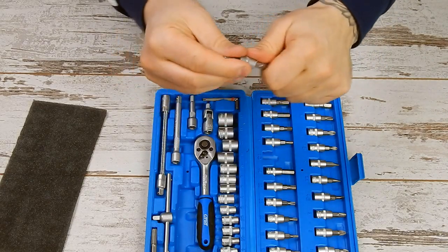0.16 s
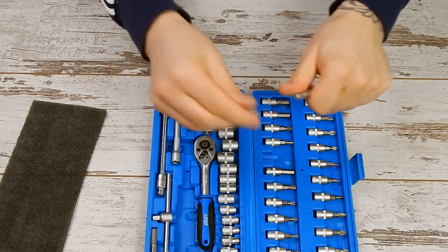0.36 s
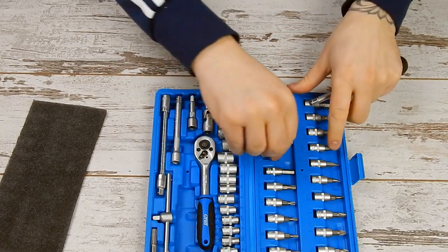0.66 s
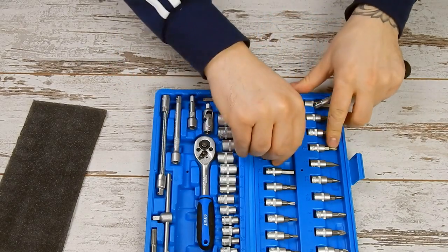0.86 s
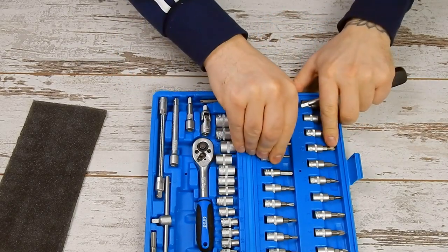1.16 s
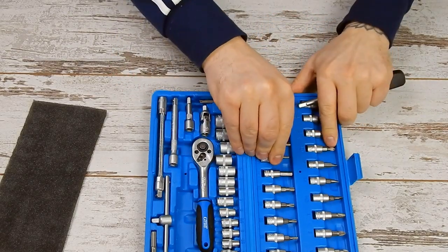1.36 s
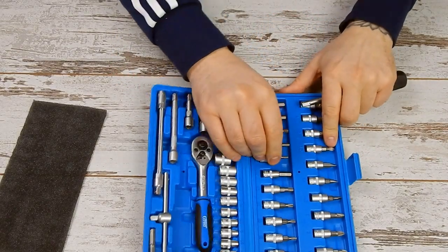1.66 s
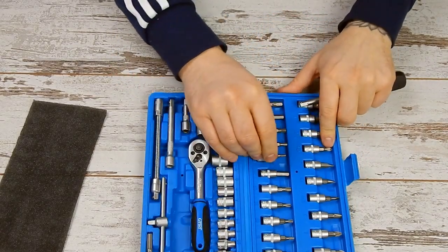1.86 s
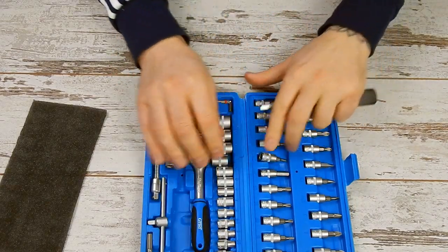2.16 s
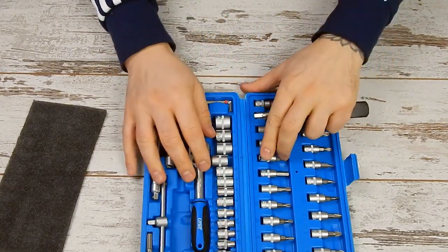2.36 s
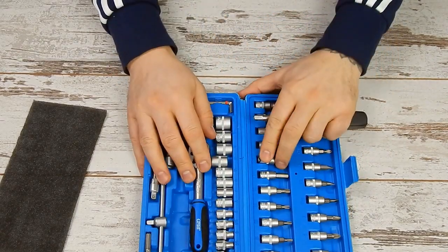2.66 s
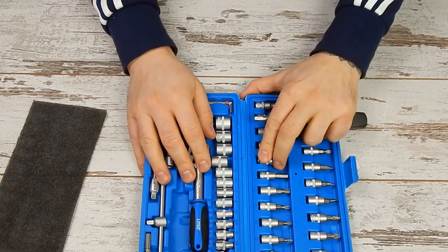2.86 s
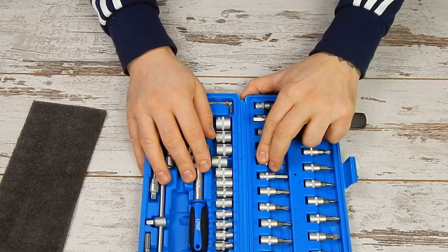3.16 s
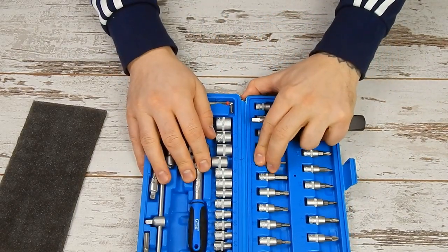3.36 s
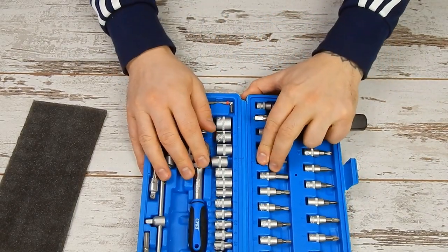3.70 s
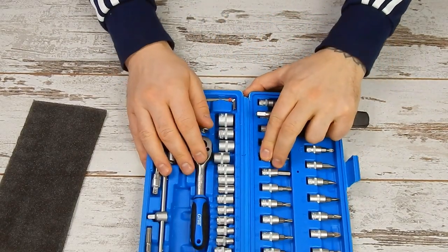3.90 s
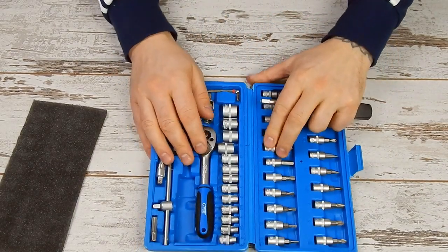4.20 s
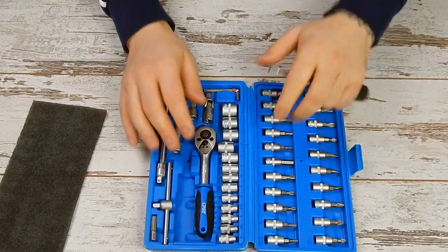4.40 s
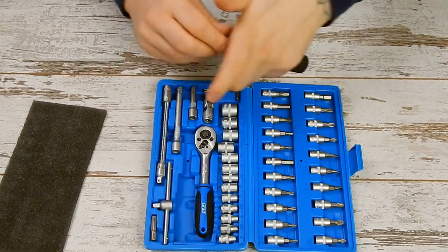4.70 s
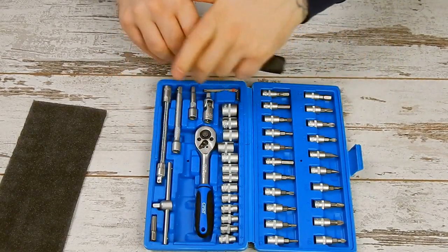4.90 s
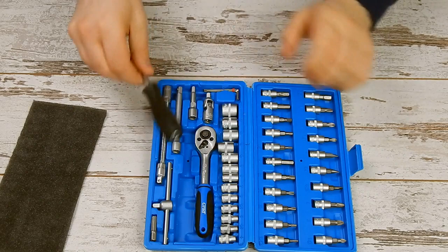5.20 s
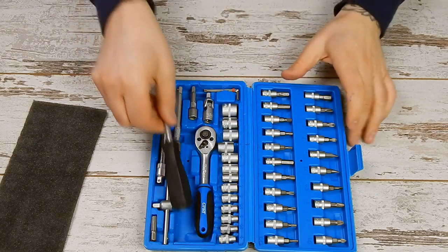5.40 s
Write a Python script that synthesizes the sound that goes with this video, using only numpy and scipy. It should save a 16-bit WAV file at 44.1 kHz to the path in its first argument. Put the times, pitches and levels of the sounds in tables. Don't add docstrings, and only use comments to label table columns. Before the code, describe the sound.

Hands at a plastic tool case: bright steel ticks, a burst of sharp clip snaps, one loud clack, sparse taps, low faint hum.

```python
import sys
import numpy as np
from scipy import signal
from scipy.fft import rfft, irfft
from scipy.io import wavfile
from scipy.ndimage import uniform_filter1d

SR = 44100
rng = np.random.default_rng(int(sys.argv[2]) if len(sys.argv) > 2 else 0)


def boost_factor(decibels):
    exponent = np.asarray(decibels, float) / 20
    return 10 ** exponent


def dump(signal):
    limited = np.clip(np.atleast_2d(signal).T, -1, 1)
    pcm = np.round(limited * 32767).astype(np.int16)
    wavfile.write(sys.argv[1], SR, pcm)


N = 244622


def on_log(table, hz):
    f, value = np.transpose(table)
    return np.interp(np.log(hz + 1), np.log(f), value)


def shaped(x, table):
    size = x.shape[-1]
    gain = boost_factor(on_log(table, np.fft.rfftfreq(size, 1 / SR)))
    y = irfft(rfft(x) * gain, size)
    return y / np.sqrt(np.mean(y ** 2))


def walk(rate_hz):
    slow = signal.butter(2, rate_hz, fs=SR, output="sos")
    y = signal.sosfilt(slow, rng.standard_normal(N))
    return y / np.std(y)


def octaves(modes, hz):
    return np.log2(np.array(modes)[:, :1] / hz)


def ring(modes, extra_db, luck, spread_db=1.5, detune=.015):
    hz, db, t60 = np.transpose(modes)[:, :, None]
    t = np.arange(SR // 15) / SR
    size = luck[:len(modes), None]
    bend = luck[::-1][:len(modes), None]
    level = boost_factor(db + extra_db + spread_db * size)
    decay = np.exp(-np.log(1000) * t / t60)
    y = level * decay * np.sin(2 * np.pi * hz * (1 + detune * bend) * t)
    y = y[::2].sum(axis=0) - y[1::2].sum(axis=0)
    return y / np.max(np.abs(y))


def strike(body, luck, length_s, db):
    bounces = luck ** 3 * np.exp(-np.arange(len(luck)) / (length_s * SR))
    bounces[0] += 18.0
    near = np.convolve(body, bounces)[:len(body)]
    near = boost_factor(db) * near / np.max(np.abs(near))
    to_room = body * np.sqrt(np.sum(near ** 2) / np.sum(body ** 2))
    return np.array([near, to_room])


def add(out, sound, s, pan_db):
    i = int(s * SR)
    part = sound[:, None, :N - i]
    out[:, :, i:i + part.shape[-1]] += part * boost_factor(np.array([[pan_db], [-pan_db]]) / 2)


def slips(rate, scatter_db):
    size_db = scatter_db * np.minimum(rng.exponential(size=N), 2)
    clicks = rng.random(N) < rate / SR
    return clicks * np.clip(rng.standard_normal(N), -2, 2) * boost_factor(size_db)


def through(x, modes):
    y = signal.fftconvolve(x, ring(modes, 0, np.zeros(len(modes))))[:N]
    return y / np.sqrt(np.mean(y ** 2))


def swell(s, rise, hold, fall):
    t = np.arange(N) / SR - s
    early = np.maximum(-t / max(rise, .002), 0)
    late = np.maximum((t - hold) / max(fall, .002), 0)
    return boost_factor(-12 * (early + late) ** 2)


def movements(table):
    return sum(boost_factor(db) * swell(s, rise, 0, fall) for s, rise, fall, db in table)


# t/s, gain level/dB,
# faint treble hiss level/dB, held t/s, recovery t/s
DUCKS = [
    (1.12, 1, -1, 0.27, .05),
    (1.72, -0.5, 2.5, 0.17, 0.042),
    (1.975, -2, -5, .15, .06),
    (3.276, -6.5, -8, 0.48, 0.13),
]


def control(column, attack_s, slower):
    t = np.arange(N) / SR - np.transpose(DUCKS)[0, :, None]
    db, held, back = np.transpose(DUCKS)[[column, 3, 4], :, None]
    fall = np.clip(t / attack_s, 0, 1)
    recovery = np.exp(-np.maximum(t - held, 0) / (slower * back))
    return np.sum(db * fall * recovery, axis=0)


HUM_HZ, HUM_DB, AIR_DB = 120.7, -48, -53
HISS_DUCK_S, HISS_SLOWER = .08, 4.3
# f/Hz, level/dB per Hz
AIR = [(12, -73), (20, -50.5), (59, -10), (90, -4), (129, 8.5), (153, -16), (176, -4.5), (260, -16.5),
       (441, -5.5), (599, -15.5), (910, -15.5), (2550, -28.5), (2850, -28), (4210, -36.5), (15600, -43)]
# f/Hz, side minus mid level/dB
AIR_SIDE = [(30, -17), (100, -8), (400, -7.5), (1000, -4.5), (2500, 0), (8000, 1)]


def background():
    t = np.arange(N) / SR
    hum_level = np.sqrt(2) * boost_factor(HUM_DB + 0.52 * walk(4.6))
    hum = hum_level * np.sin(2 * np.pi * HUM_HZ * t + 0.26 * walk(24))
    air = [(hz, v - 12 * (abs(hz - HUM_HZ) < 25)) for hz, v in AIR]
    mid = shaped(rng.standard_normal(N), air)
    width = boost_factor(on_log(AIR_SIDE, np.fft.rfftfreq(N, 1 / SR)))
    side = irfft(rfft(shaped(rng.standard_normal(N), air)) * width, N)
    both = boost_factor(AIR_DB + 0.37 * walk(6.3)) * (mid + side * np.array([[1], [-1]]))
    low = signal.sosfiltfilt(signal.butter(2, 2500, fs=SR, output="sos"), both)
    hiss = both - low
    return hum + low + boost_factor(control(2, HISS_DUCK_S, HISS_SLOWER)) * hiss


# f/Hz, level/dB, t60/s
STEEL = [(5100, -2, .004), (6140, 0, .005), (7400, -3, .003), (8500, -3, .003), (9400, -1, .004),
         (10400, 0, .004), (11400, -1, .003), (12400, -2, .003), (13500, -3, .003), (14800, -4, .003)]
# f/Hz, level/dB, t60/s
HOLDER = [(2500, 0.5, 0.0022), (2780, -4.5, 0.0068), (3370, -2.5, 0.0072), (3800, -2, 0.0045),
          (4750, -16.5, 0.012)]
# t/s, peak level/dB, low ring level/dB, brightest f/Hz, left minus right level/dB
TICKS = [
    (0.0355, -64, 2, 10750, -1.5),
    (0.0631, -28, -5, 12400, -3),
    (0.1388, -22, -39, 5740, 1),
    (0.1411, -20.5, -3.5, 9800, -6.5),
    (0.142, -39, -9, 5500, -9),
    (1.8764, -45, 0.5, 5300, -2),
    (2.3804, -50, -3, 8400, -8),
    (3.272, -22.5, -17, 11500, -6),
    (3.6324, -40.5, -11.5, 12000, -7),
]


def ticks():
    out = np.zeros((2, 2, N))
    for (s, db, low_db, hz, pan_db), luck in zip(TICKS, rng.standard_normal((len(TICKS), 700))):
        near_db = -4.5 * octaves(STEEL, hz) ** 2
        steel = strike(ring(STEEL, near_db, luck), luck, .0025, db)
        low = strike(ring(HOLDER, 0, luck[20:]), luck[20:], 0.0063, db + low_db)
        add(out, steel + low, s, pan_db)
    return out


# f/Hz, width ratio, t60/s, level/dB; the narrow row is the hollow lid
ROOM = [(131, 1.3, 0.5, -16), (274, 1.25, 0.4, -14.5), (508, 1.26, 0.36, -16.5), (787, 1.085, 0.41, -12.5),
        (1310, 1.365, 0.29, -12), (2370, 1.2, 0.24, -10), (3430, 1.3, 0.27, -18), (4705, 1.243, 0.2, -10),
        (9540, 1.382, 0.14, -4), (13900, 1.12, 0.17, -10)]


def room(x):
    t = np.arange(SR // 2) / SR
    tail = 0
    for hz, wide, t60, db in ROOM:
        edges = [(hz / wide ** 2.6, -30), (hz / wide, 0), (hz * wide, 0), (hz * wide ** 2.6, -30)]
        mid, side = shaped(rng.standard_normal((2, len(t))), edges)
        both = mid + min(hz / 2600.0, 1) * side * np.array([[1], [-1]])
        level = boost_factor(db) * np.sqrt(hz * np.log(wide) / SR)
        tail = tail + level * both * np.exp(-np.log(1000) * t / t60)
    tail = tail * np.clip((t - .004) / .004, 0, 1)
    mono = x.mean(axis=0, keepdims=True)
    return boost_factor(-10.5) * signal.fftconvolve(mono, tail, axes=1)[:, :N]


# strongest t/s, rise t/s, fall t/s, level/dB
RUBS = [
    (.4, 0.17, 0.1, -75),
    (.82, 0.39, .17, -60.5),
    (1.091, .09, 0.061, -63),
    (1.49, 0.13, .04, -62),
    (2.38, 0.2, 0.37, -62.5),
    (4.203, .11, 0.082, -54),
    (4.68, 0.055, 0.032, -69),
    (5.05, 0.12, 0.077, -57.5),
    (5.27, 0.033, .035, -65),
]
# f/Hz, level/dB
RUB_COLOUR = [(3000, -1.5), (4500, 0.5), (5400, -4.5), (6300, -1), (7700, -7.5), (9400, -1.5), (11000, -4),
              (15000, -7.5)]


def rubs():
    return movements(RUBS) * shaped(slips(18000, 0.74), [(1500, -49)] + RUB_COLOUR)


# strongest t/s, rise t/s, fall t/s, level/dB
SHUFFLE = [
    (.3, 0.048, 0.092, -70),
    (.73, 0.13, 0.082, -39.5),
    (1.09, 0.086, .06, -47.5),
    (1.45, 0.081, 0.36, -44),
    (2.43, 0.16, 0.13, -42),
    (3.9, 0.026, 0.39, -50.5),
    (4.2, 0.19, 0.17, -44),
    (4.49, 0.018, 0.017, -50),
    (5.2, 0.079, 0.079, -54),
]
# f/Hz, level/dB
SHUFFLE_COLOUR = [(150, -45), (250, -12.5), (447, 6.5), (625, -11), (718, -6), (1120, -6.5), (1250, -8.5),
                  (1600, -15), (1990, -16), (4000, -31.5), (5200, -56), (8800, -120)]


def shuffle():
    return movements(SHUFFLE) * shaped(slips(1500, 1.2), SHUFFLE_COLOUR)


CRACK_S, CRACK_DB = 0.0023, 2
# f/Hz, level/dB, t60/s
SHELL = [(332.3, 8.5, 0.017), (390, -2, 0.042), (427, 5, 0.045), (530, -5.5, 0.047), (553, 11, 0.023),
         (617.5, 8, 0.023), (677, 1.5, 0.055), (780, -8.5, 0.12), (824, 3.5, 0.016), (1123, 10.5, 0.011),
         (1193, 9, 0.021), (1370, 6, 0.016)]
# f/Hz, level/dB, t60/s
CLIPS = [(1650, 0, .007), (1880, 0, .007), (2150, -2, .006), (2500, -4, .005), (2950, -3, .006),
         (3350, -4, .006), (3800, -8, .004), (4300, -12, .003)]


def blows(table, room_db, pan_db, focus_db):
    out = np.zeros((2, 2, N))
    for (s, db, hz, clip_db, steel_db), luck in zip(table, rng.standard_normal((len(table), 500))):
        tilt_db = (steel_db - clip_db + 9.0) * octaves(CLIPS, 2500)
        near_db = focus_db * octaves(SHELL, hz) ** 2
        shell = strike(ring(SHELL, near_db, luck), luck, 0.0018, db)
        clips = strike(ring(CLIPS, tilt_db, luck[20:]), luck[20:], 0.0061, db + clip_db)
        steel = strike(ring(STEEL, 0, luck[60:]), luck[60:], 0.00042, db + steel_db)
        crack = uniform_filter1d(uniform_filter1d(luck[100:], size=5), size=6)
        crack = crack * np.exp(-np.arange(400) / (CRACK_S * SR))
        clips[:, :400] += boost_factor(db + clip_db + CRACK_DB) * crack
        add(out, (shell + clips + steel) * boost_factor([[0], [room_db]]), s, pan_db)
    return signal.sosfilt(signal.butter(4, 360, "high", fs=SR, output="sos"), out)


CASE_PAN_DB = -2.1
# t/s, peak level/dB, shell f/Hz, clip ring level/dB, steel tick level/dB
KNOCKS = [(0.586, -32.5, 400, -11, -28), (0.645, -23.5, 635, -4, -9), (0.728, -30, 680, -13.5, -13),
          (0.754, -41, 431, -20, -27), (0.958, -56, 471, -19, -22), (1.033, -38.5, 397, -24, -30),
          (1.424, -29.5, 410, -17, -24.5), (1.546, -14, 497, -1.5, -10.5), (1.589, -15, 1160, -31, -15),
          (1.649, -30.5, 735, -20, -27), (1.71, -14, 1480, 4.5, -8.5), (1.715, -13, 590, -15, -28.5),
          (1.968, -8.5, 1012, -1, -16), (2.007, -14, 860, -26, -37)]


def knocks():
    return blows(KNOCKS, 0, CASE_PAN_DB, -17.5)


# t/s, peak level/dB, shell f/Hz, clip ring level/dB, steel tick level/dB
TAPS = [(1.08, -35.5, 720, -22, -12), (1.092, -49, 770, -9, -22), (1.548, -13, 1320, -18, -26.5),
        (1.597, -24, 1220, 3.5, -22.5), (2.428, -33.5, 760, -16, -33.5), (3.654, -43.5, 1028, 0.5, -21),
        (4.236, -33.5, 564, -8, -51), (4.244, -39.5, 1000, -12, -12.5), (4.308, -39, 1100, -5.5, -32),
        (4.315, -34.5, 690, -11, -38), (4.377, -42.5, 980, -4, -36), (5.51, -25.5, 840, -4, -25)]


def taps():
    return blows(TAPS, -5, -3, -14.0)


PRESS_S, LET_GO_S = .008, 0.042
# start t/s, press t/s, level/dB
THUMP = [
    (1.55, 0.018, -49),
    (1.715, 0.1, -20.5),
    (1.97, 0.026, -37),
    (3.275, 0.05, -31.5),
    (4.2, .03, -46),
    (5.507, 0.026, -41),
]
# f/Hz, level/dB, t60/s
TABLE = [(81.6, -7, 0.34), (132.7, 0.5, 0.28), (158, -3.5, 0.022), (180.2, -7.5, 0.16), (215, -28, 0.2)]


def thump():
    press = sum(boost_factor(db) * swell(s, PRESS_S, hold, LET_GO_S) for s, hold, db in THUMP)
    return press * through(slips(300, 4.8), TABLE)


SKID_GRIP_S, SKID_STOP_S, CLIP_SHAKE_DB = .005, 0.05, -1.5
# start t/s, slide t/s, shell boom level/dB, shell clack level/dB, steel rattle level/dB
SKIDS = [
    (1.558, 0.032, -24.5, -29, -46),
    (1.717, 0.027, -11, -26.5, -43.5),
    (1.977, 0.0067, -42.5, -28.5, -46),
]


def skids():
    slip = slips(1500, 2.0)
    boom = through(slip, SHELL[1:7])
    clack = through(slip, SHELL[7:]) + boost_factor(CLIP_SHAKE_DB) * through(slip, CLIPS)
    rattle = through(slip, STEEL)
    out = np.zeros(N)
    for s, slide, boom_db, clack_db, steel_db in SKIDS:
        shaken = boost_factor(boom_db) * boom + boost_factor(clack_db) * clack + boost_factor(steel_db) * rattle
        out += swell(s, SKID_GRIP_S, slide, SKID_STOP_S) * shaken
    return out


# t/s, peak level/dB, shell f/Hz, clip ring level/dB, steel tick level/dB
SEATING = [(2.277, -32, 655, -15.5, -44), (2.289, -31, 1320, -4.5, -44.5), (2.595, -24, 972, -0.5, -17),
           (3.272, -3.5, 808, -10.5, -18.5), (3.281, -25.5, 925, -1, -24), (3.596, -42, 530, -17.5, -37),
           (3.874, -49, 420, -1.5, -36.5), (3.965, -40.5, 430, -8, -34), (4.104, -37, 490, -22, -25),
           (5.505, -14.5, 410, -10, -21), (5.519, -20, 564, -31, -32), (5.539, -25.5, 385, -7, -27)]


def seating():
    return blows(SEATING, 0, CASE_PAN_DB, -17.5)


def scene():
    handling = rubs() + shuffle() + thump() + skids()
    direct, send = ticks() + knocks() + taps() + seating() + boost_factor(-6.5) * handling
    return direct + room(send) + background()


def roll_off(x):
    return signal.sosfilt(signal.butter(12, 15750, fs=SR, output="sos"), x)


DUCK_S, SMEAR_S, SMEAR_DB = 0.034, .024, -1
# f/Hz, level/dB
SMEAR = [(150, -30.5), (500, -11.5), (1500, -15), (4000, -4.5), (15000, 1)]


def record(dry):
    x = dry * boost_factor(control(1, DUCK_S, 0.36))
    size = int(SMEAR_S * SR)
    ahead = shaped(rng.standard_normal((2, size)), SMEAR)
    ahead = ahead * np.linspace(.3, 1, size) / np.sqrt(size)
    x = x + boost_factor(SMEAR_DB) * signal.fftconvolve(x, ahead, axes=1)[:, size - 1:]
    x = signal.sosfilt(signal.ellip(10, .2, 70, 15800, fs=SR, output="sos"), x)
    return roll_off(x)


dry = scene()
out = record(dry)
dump(out)
```